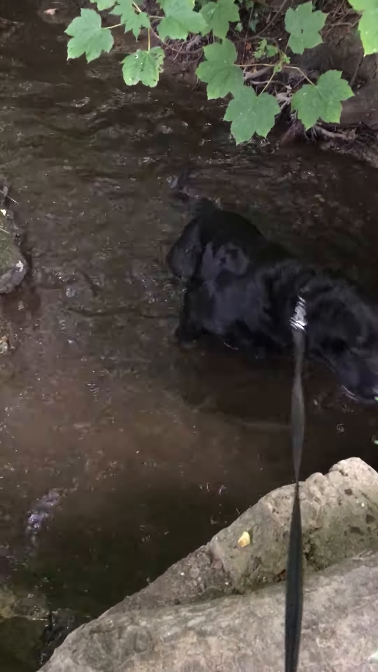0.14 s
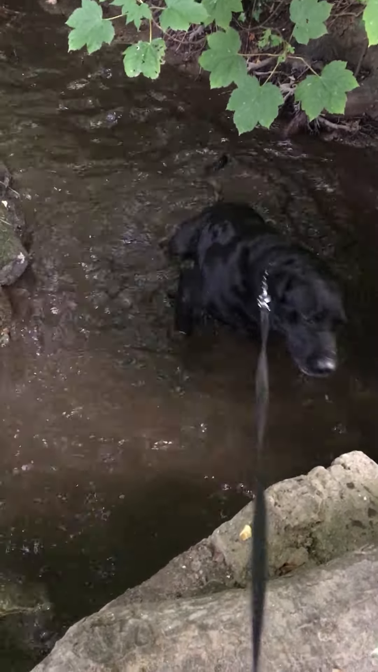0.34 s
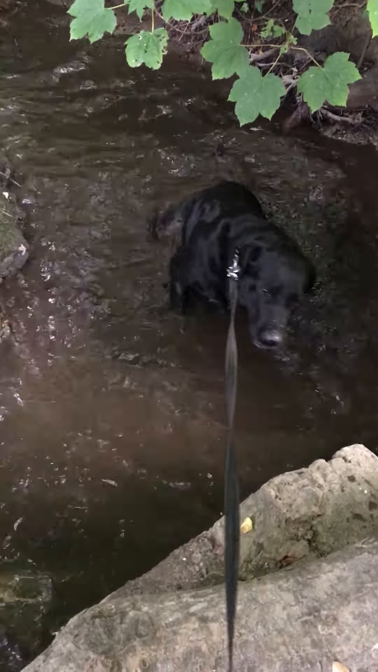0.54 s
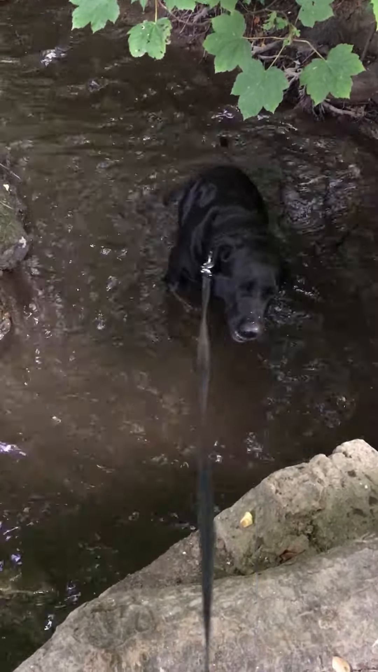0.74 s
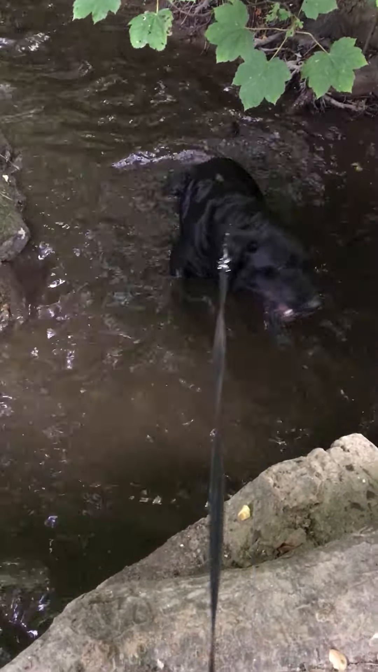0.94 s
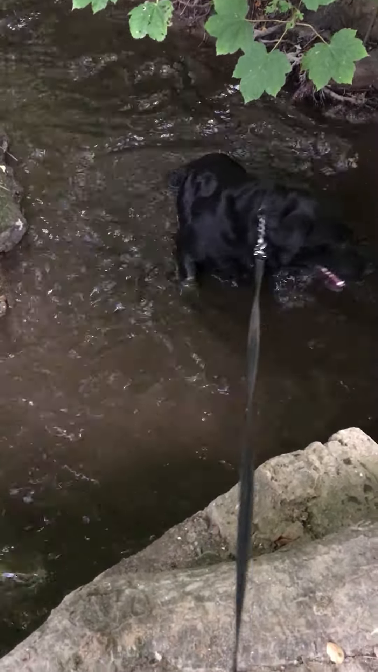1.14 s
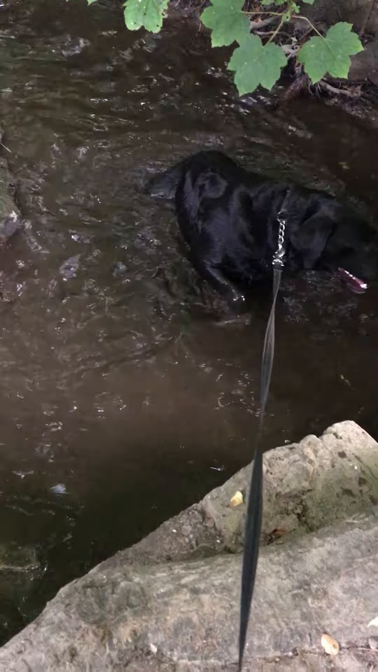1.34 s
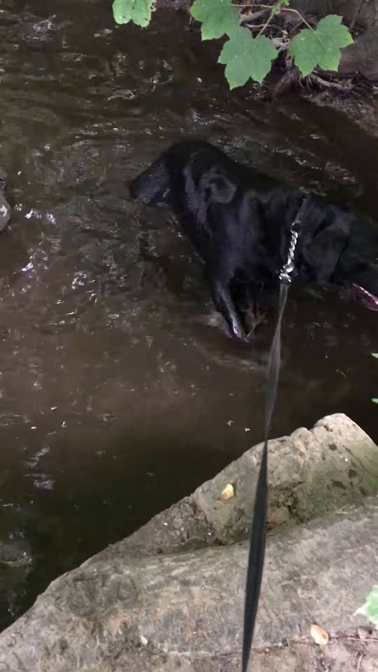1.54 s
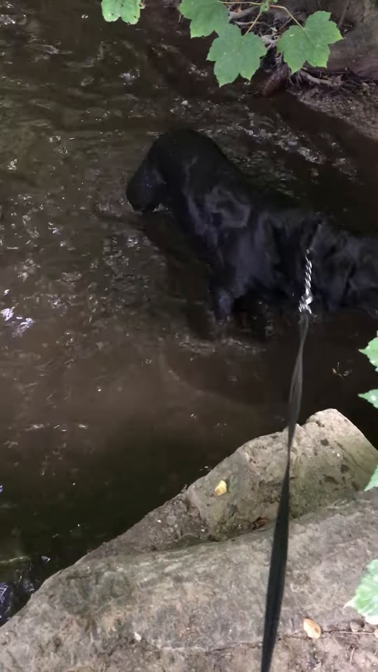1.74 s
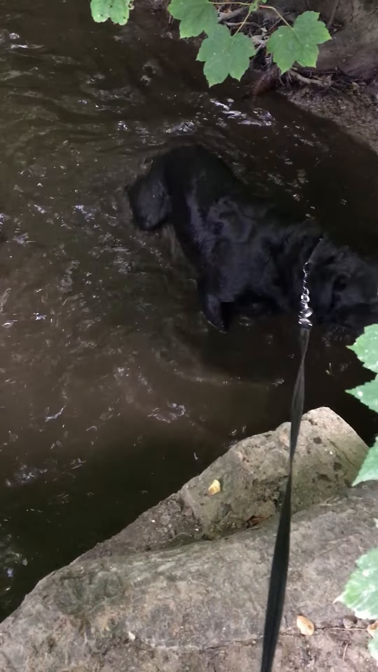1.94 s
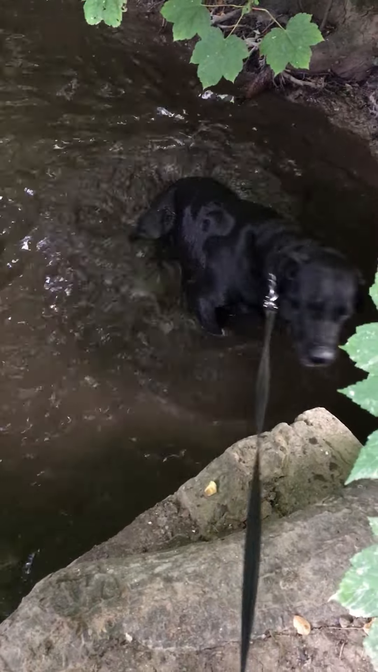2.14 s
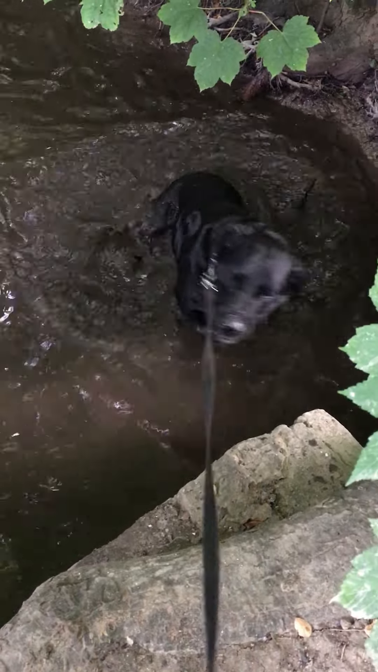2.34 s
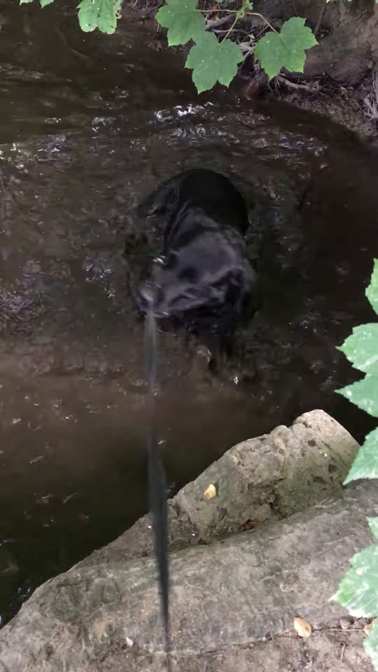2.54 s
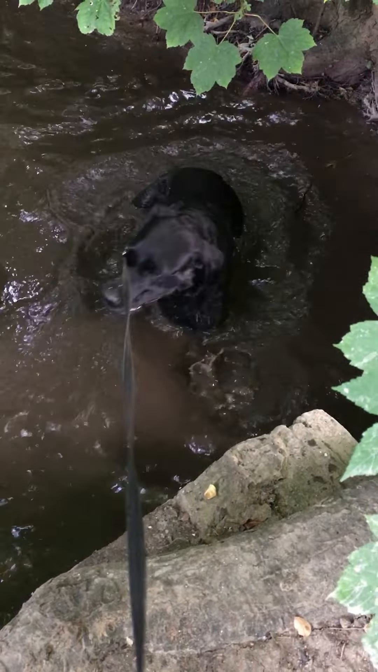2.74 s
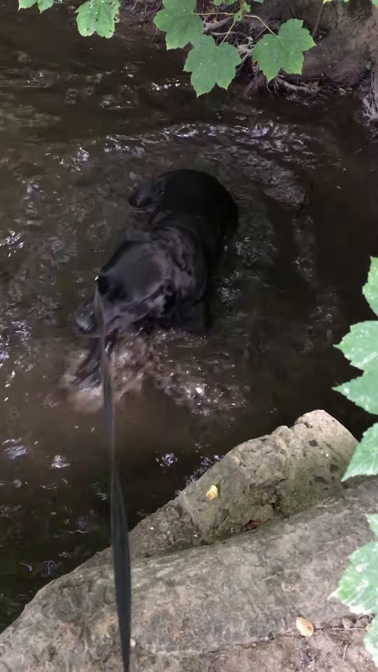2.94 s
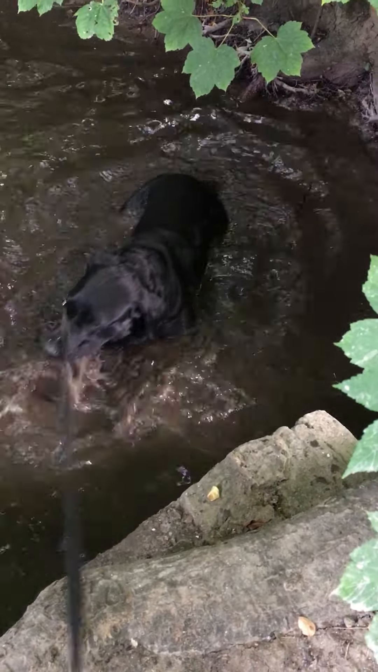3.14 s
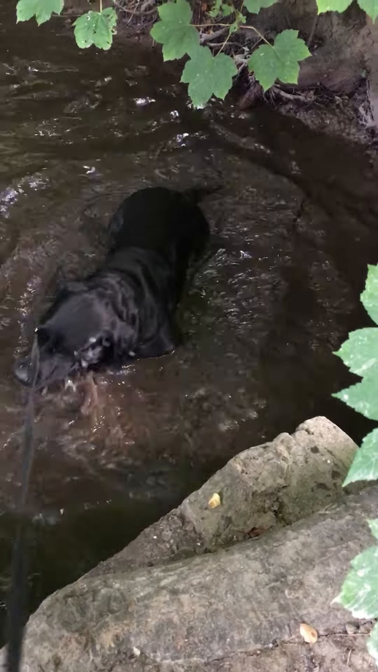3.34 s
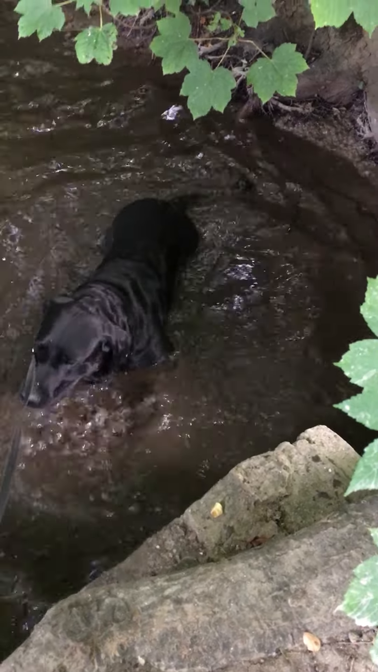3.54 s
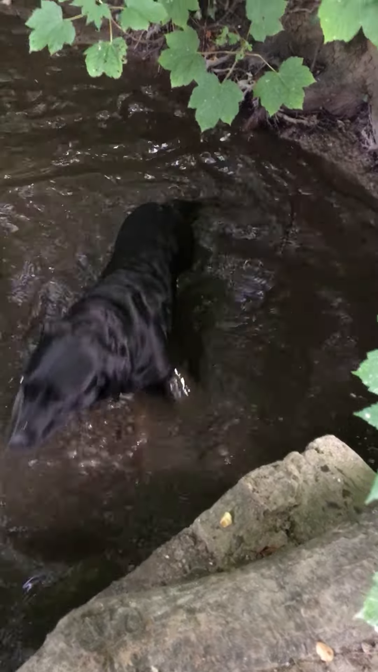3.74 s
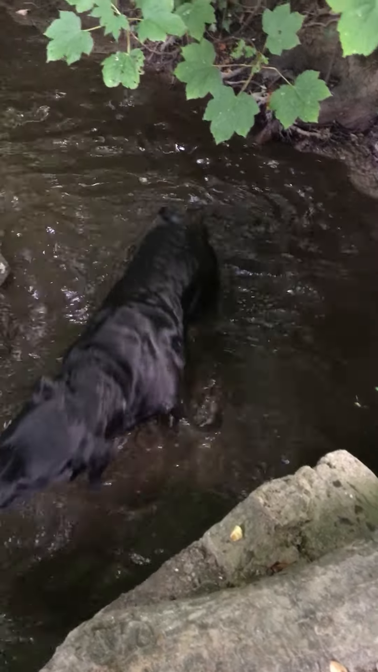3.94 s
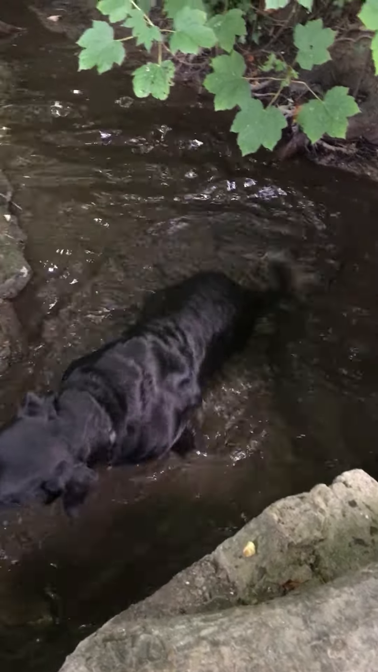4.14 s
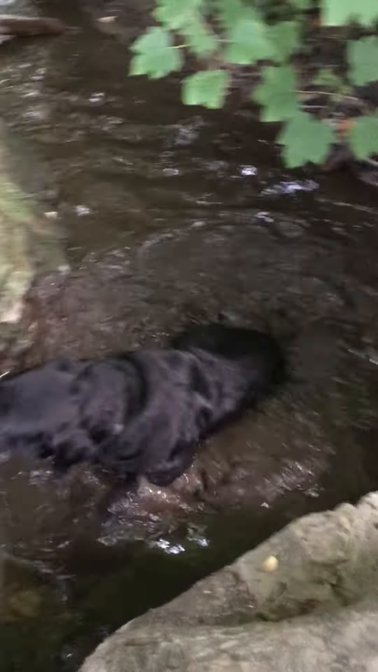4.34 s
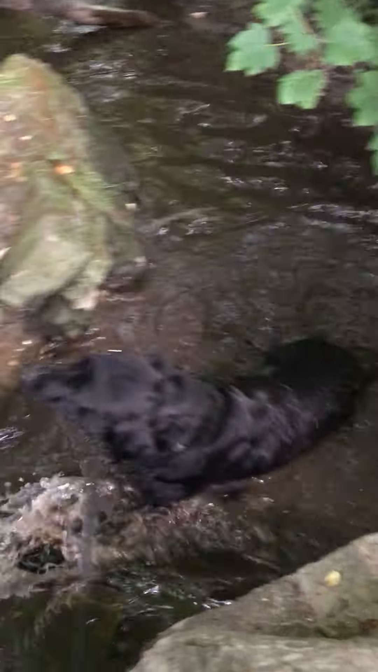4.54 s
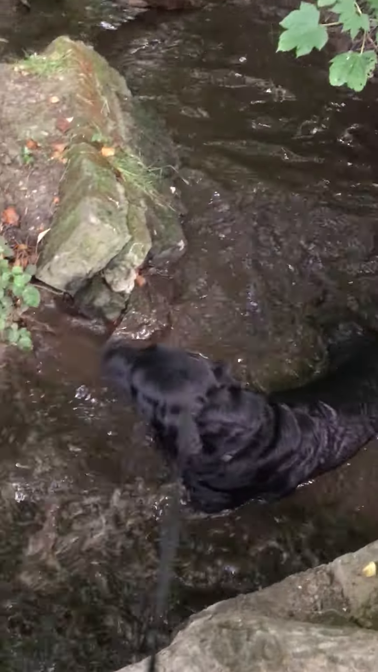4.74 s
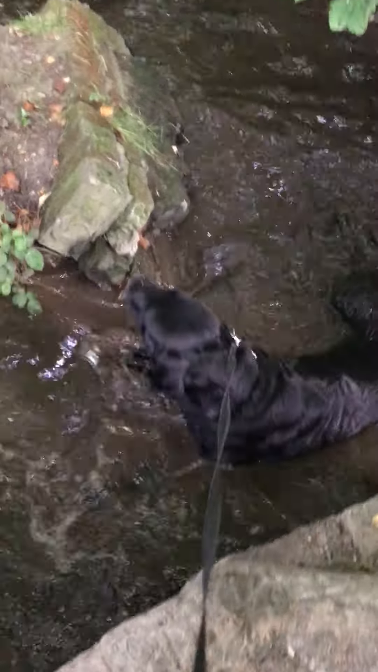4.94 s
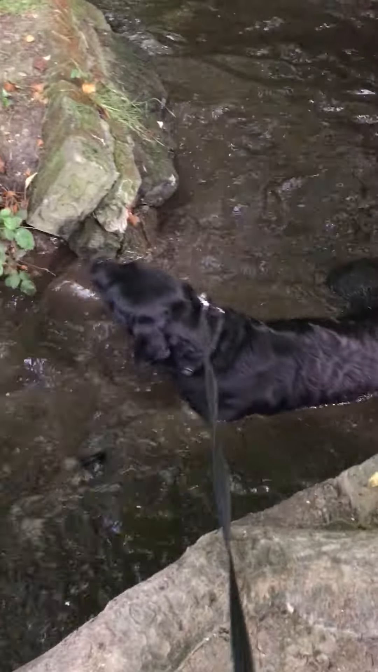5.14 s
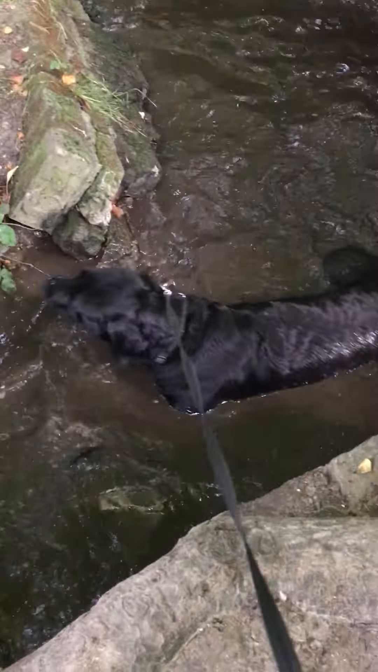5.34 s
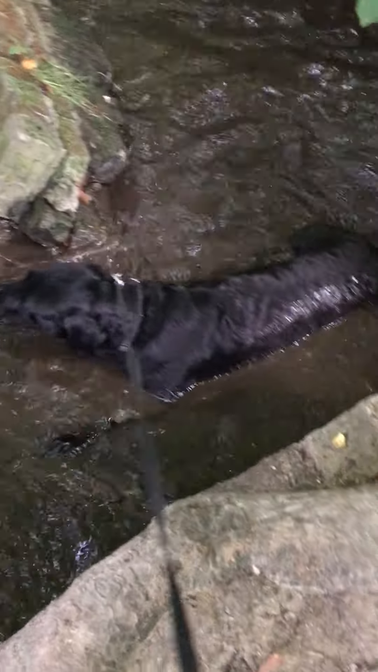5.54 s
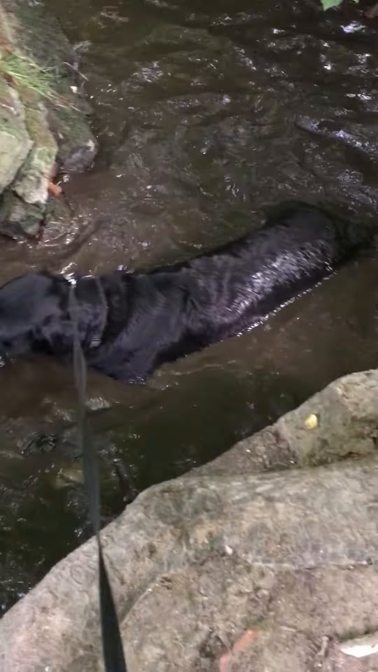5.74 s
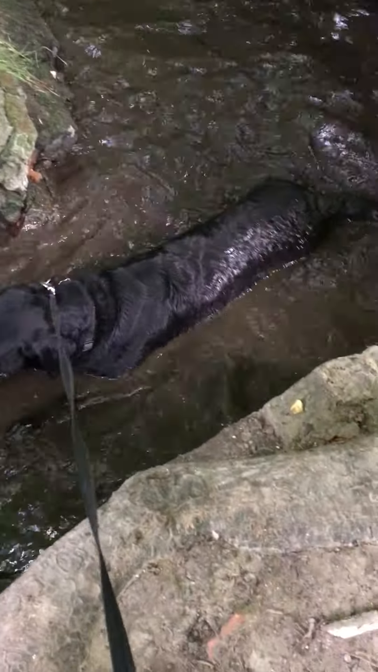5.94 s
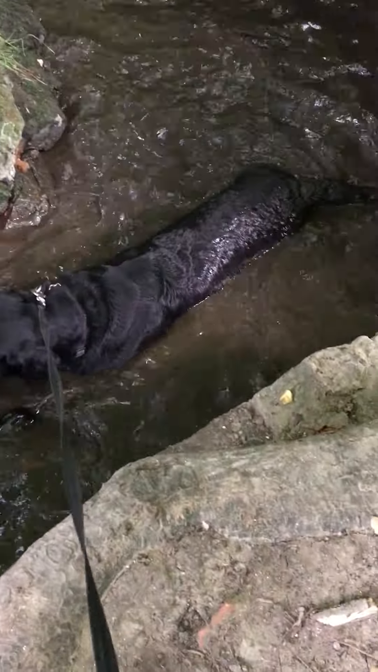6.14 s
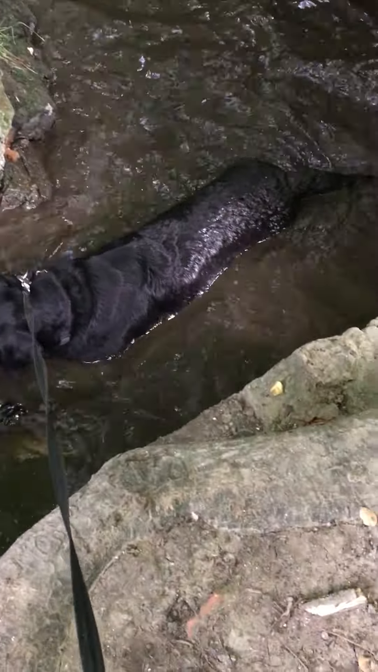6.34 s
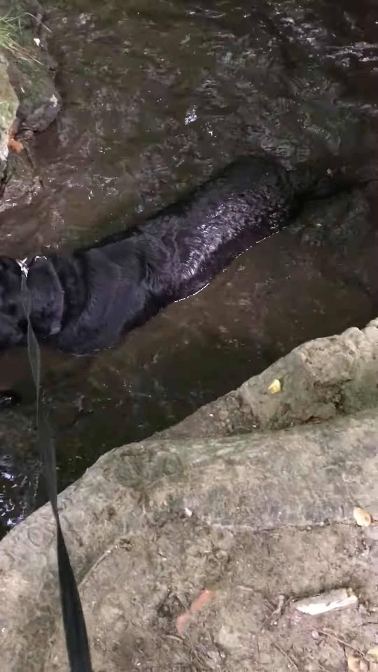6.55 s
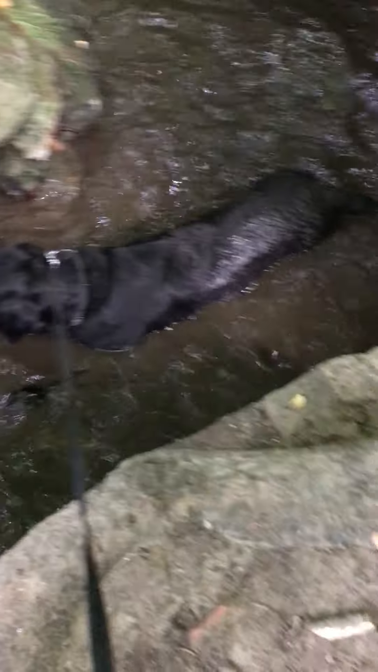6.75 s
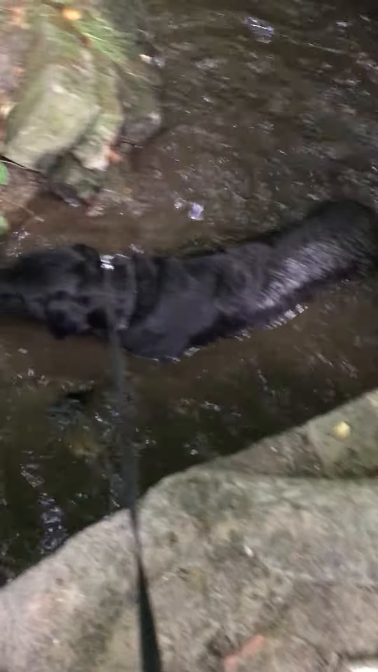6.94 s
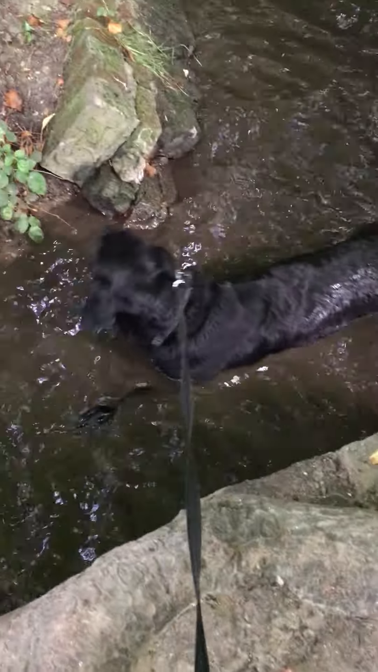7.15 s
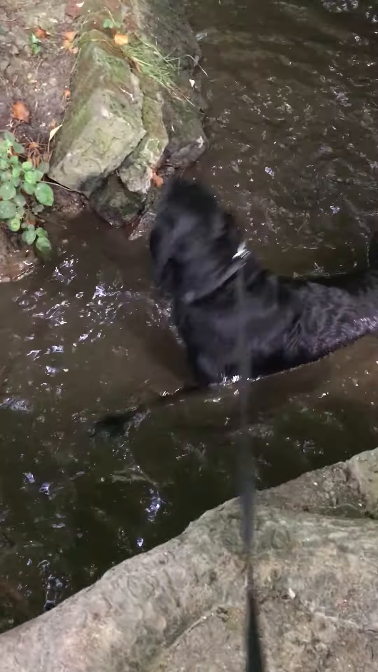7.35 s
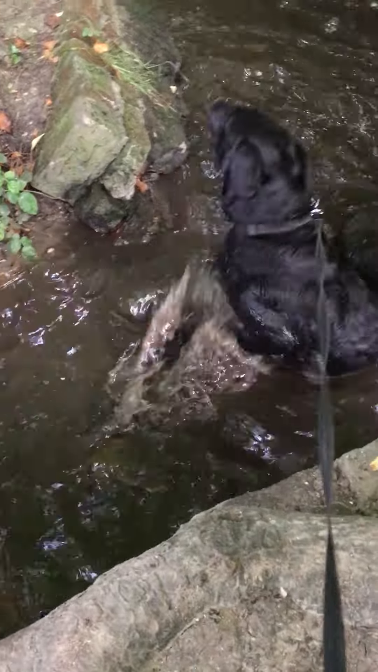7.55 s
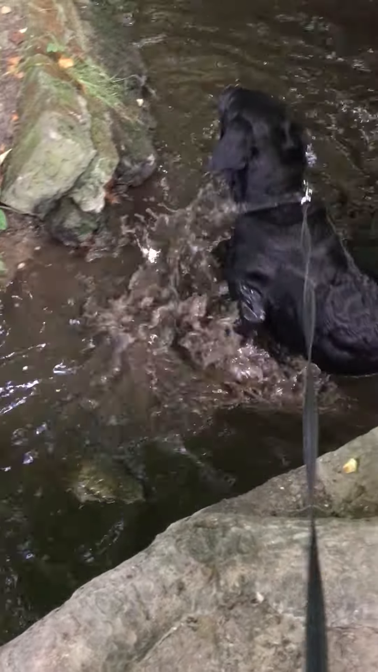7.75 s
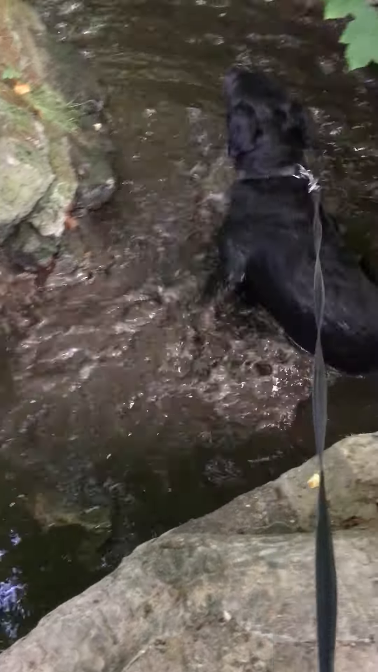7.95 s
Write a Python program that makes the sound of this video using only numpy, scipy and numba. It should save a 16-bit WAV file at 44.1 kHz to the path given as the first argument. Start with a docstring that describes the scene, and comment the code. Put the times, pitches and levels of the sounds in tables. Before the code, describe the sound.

A dog wades in a shallow woodland stream, with splashy slaps, bubbling sloshes and soft early panting, then a quiet birdsong lull before vigorous churning.

```python
"""First a leg sweeps and slaps the water: a dog wades in a shallow woodland stream, lunging off at the end.
It is a few steps below the microphone: slaps are crackling noise bursts, trapped air rings as damped sines,
and swarms of tiny bubbles and spray follow the stirring. Hollows gulp, legs thump and the coat drips.
Early on it pants softly, as puffs of noise shaped by the muzzle; later its lead slides and the reel turns.
A songbird trills far off among the trees, in buzzing sines, over noise for the stream and a low rumble."""
import sys
import numpy as np
from scipy import signal
from scipy.fft import rfft, irfft
from scipy.io import wavfile
from numba import njit

SR = 44100
rng = np.random.default_rng(int(sys.argv[2]) if len(sys.argv) > 2 else 0)


def inscribe(sig):
    """Save sig as 16-bit PCM at rate SR to the path in sys.argv[1].

    A 1-D sig is mono; a 2-D sig holds one channel per row.
    Samples are clipped to [-1, 1] before scaling.
    """
    pcm = np.round(np.clip(np.atleast_2d(sig).T, -1, 1) * 32767)
    wavfile.write(sys.argv[1], SR, pcm.astype(np.int16))


N = 357210
TIME = np.arange(N) / SR


def amp(db):
    """Decibels to gain."""
    return 10 ** (np.asarray(db) / 20)


def unit(x):
    """Scales to rms 1."""
    return x / np.sqrt(np.mean(x ** 2) + 1e-20)


def read(points, hz):
    """A spectrum's gain at hz, interpolated in dB on a log-frequency axis."""
    f, db = np.transpose(points)
    return amp(np.interp(np.log(hz + 1), np.log(f), db))


def colour(x, points):
    """Filters x by a spectrum."""
    hz = np.fft.rfftfreq(len(x), 1 / SR)
    return irfft(rfft(x) * read(points, hz), len(x))


def drift(size, hz):
    """Smooth random wandering of rms 1: noise with a Gaussian low-pass of scale hz."""
    lowpass = np.exp(-(np.fft.rfftfreq(size, 1 / SR) / hz) ** 2)
    return unit(irfft(rfft(rng.standard_normal(size)) * lowpass, size))


def split(x):
    """Divides a water sound near 2600 Hz into its body and its spray, each at rms 1."""
    hz = np.fft.rfftfreq(len(x), 1 / SR)
    body = irfft(rfft(x) / (1 + (hz / 2600) ** 8), len(x))
    return unit(body), unit(x - body)


def add(mix, s, sound):
    """Mixes a sound in at time s."""
    part = mix[max(round(s * SR), 0):][:len(sound)]
    part += sound[:len(part)]


def swells(rows, taper):
    """A level that swells, holds and fades once for each row."""
    out = np.zeros(N)
    for s, length, db in rows:
        add(out, s, amp(db) * signal.windows.tukey(int(length * SR), taper))
    return out


def resonate(x, hz, width):
    """A resonance at hz: shifts that pitch to zero, smooths with one pole, and shifts back."""
    turn = np.exp(2j * np.pi * np.cumsum(hz * np.ones(len(x))) / SR)
    r = np.exp(-np.pi * width / SR)
    return 2 * (turn * signal.lfilter([1 - r], [1, -r], x / turn)).real


def tail(x, t60):
    """Diffuse echoes: sparse random taps that lose 60 dB in t60 seconds."""
    t = np.arange(SR) / SR
    taps = rng.standard_normal(SR) * (rng.random(SR) < .1)
    echoes = taps * amp(-60 * t / t60) * np.minimum(t / 0.0011, 1)
    return signal.oaconvolve(x, echoes / np.linalg.norm(echoes))[:N]


def bubble(hz, cycles, rise):
    """A pocket of air rings and dies; its pitch climbs as it nears the surface."""
    turns = np.arange(int(7 * cycles / hz * SR) + 2) * hz / SR
    age = turns / cycles
    return (1 - np.exp(-2 * turns)) * np.exp(-age) * np.sin(2 * np.pi * turns * (1 + rise * age))


# paws and thrown water hitting the surface: (t/s, body onset level/dB, spray onset level/dB, decay/s,
# trapped air's starting f/Hz, its gain/dB)
SURFACE_SLAPS = [(.0273, -36.5, -41.5, 0.0054, 470, -20.5), (.069, -39, -38, 0.0069, 2860, -22),
                 (.6293, -51, -64, 0.01, 520, -30), (.7777, -48, -43.5, 0.0062, 1040, -25),
                 (.8195, -40.5, -33.8, 0.0057, 2200, -29), (.939, -72, -53, .002, 9500, -25),
                 (1.4377, -48, -56, .02, 1100, -28), (1.446, -46, -55, .006, 1250, -26),
                 (1.5495, -56, -30.5, 0.0053, 3020, -38), (1.7768, -47, -43.5, 0.004, 1210, -31),
                 (1.8841, -69, -47, 0.0046, 3270, -32), (1.921, -54, -45.5, 0.017, 2400, -38),
                 (1.9961, -35.5, -36, 0.0055, 766, -15.5), (2.024, -34, -39, 0.0044, 1300, -22),
                 (2.138, -56, -41, 0.0072, 4200, -16.5), (2.4193, -29.5, -37.5, 0.0055, 900, -16.5),
                 (2.4486, -30, -31, 0.0016, 2330, -32), (2.4992, -40, -46.5, 0.0088, 467, -23.5),
                 (2.6865, -52, -39.5, .008, 470, -28), (2.99, -37.5, -35, .012, 880, -31),
                 (3.15, -35, -33, 0.0095, 362, -20.5), (3.1612, -41, -31, 0.01, 2040, -17),
                 (3.096, -54, -42.5, 0.0034, 5200, -39), (3.4538, -72, -37, 0.0015, 9150, -20),
                 (3.599, -45, -52, .018, 480, -31), (3.6495, -46, -28, 0.0012, 2040, -15.5),
                 (3.842, -46, -35.5, 0.0045, 2800, -20), (4.3667, -46, -31.5, 0.0078, 2830, -19),
                 (4.443, -31.5, -36, 0.0072, 1200, -32), (4.531, -28, -25, 0.0053, 740, -15),
                 (4.6184, -38, -29.4, 0.0021, 2180, -11.5), (5.088, -35, -43, .017, 1200, -15),
                 (5.419, -39.5, -49.5, 0.011, 1090, -47), (5.4815, -37, -30, 0.0066, 2950, -28),
                 (5.649, -44, -41.5, .0097, 640, -24), (6.186, -46.5, -61, 0.0065, 1220, -38),
                 (6.233, -54, -49, 0.0067, 1990, -35), (6.6935, -59, -55, 0.0093, 1120, -37),
                 (7.505, -63, -45, .0046, 2470, -8), (7.555, -55, -33, 0.012, 3000, -32),
                 (7.782, -51, -42, 0.0031, 800, -20), (8.01, -57, -30.5, 0.0017, 900, -26)]
# colour of a slap, close to the microphone: (f/Hz, level/dB)
SLAP_SPECTRUM = [(60, -10), (200, 0), (500, -13), (1300, 4), (2300, -6.5), (3000, -2), (6000, -1.5),
                 (9000, -10), (10500, -12.5), (12000, -13.5), (16000, -16)]
POCKET_CYCLES = 1.24  # air caught under a slap bursts almost at once


def slaps(attack=0.00014, crackle_db=1.0, variety_db=1.5, rise=0.0032):
    """Each slap is a sudden burst of crackle in its own colour, with the knock of the air trapped under it."""
    out, t = np.zeros(N), np.arange(SR // 8) / SR
    for s, low_db, high_db, decay, pocket_hz, pocket_db in SURFACE_SLAPS:
        tint = [(hz, db + variety_db * rng.standard_normal()) for hz, db in SLAP_SPECTRUM]
        crackle = rng.standard_normal(len(t)) * amp(crackle_db * drift(len(t), 600))
        body, mist = split(colour(crackle, tint))
        fade = np.exp(-t / decay) * (1 - np.exp(-t / attack))
        burst = amp(low_db) * unit(body * fade) + amp(high_db) * unit(mist * fade)
        # undo the averaging over the fade, so the table levels are those at the onset
        add(out, s - attack, burst * np.sqrt(np.mean(np.exp(-2 * t / decay))))
        add(out, s, amp(pocket_db) * bubble(pocket_hz, POCKET_CYCLES, rise))
    return out


# legs sweeping through the water: (start t/s, length/s, slosh level/dB before the trim in churn, spray level/dB)
LEG_STROKES = [(0.003, 0.088, -50.5, -55.5), (0.307, 0.029, -58.5, -59.5), (0.676, 0.11, -56, -75),
               (0.826, 0.023, -50.5, -56), (0.936, 0.025, -57, -55.5), (1.286, 0.11, -69, -62.5),
               (1.431, 0.062, -48, -60.5), (1.504, 0.032, -47.5, -45), (1.77, 0.033, -65, -61.5),
               (1.917, 0.09, -45.5, -51), (2.009, 0.032, -37, -44.5), (2.066, 0.033, -41.5, -51),
               (2.154, 0.091, -45.5, -50), (2.41, 0.038, -45.5, -47.5), (2.535, 0.015, -44.5, -49),
               (2.616, 0.065, -43.5, -57.5), (2.787, 0.097, -46, -60), (2.891, .11, -45, -47),
               (3.11, 0.13, -53.5, -51.5), (3.495, 0.18, -63.5, -60), (3.892, 0.19, -51.5, -56.5),
               (4.061, 0.096, -44, -52.5), (4.107, 0.092, -43, -44), (4.335, 0.14, -38.5, -47),
               (4.5, 0.069, -38.5, -40), (4.57, 0.23, -45.5, -44.5), (4.869, 0.18, -43.5, -50),
               (5.055, 0.027, -42, -45), (5.204, 0.033, -52.5, -57), (5.466, 0.027, -54, -49),
               (6.022, 0.019, -52.5, -58.5), (7.462, 0.043, -46.5, -49.5), (7.491, 0.062, -35.5, -39.5),
               (7.557, 0.17, -35.5, -40.5), (7.734, 0.21, -37.5, -39.5), (7.97, 0.15, -34.5, -41)]
STROKE_ATTACK_S, SLOSH_RELEASE_S, SPRAY_RELEASE_S = 0.022, 0.035, 0.032
WAKE_DB, WAKE_S = -14, 0.19  # the disturbed water settles slowly after each stroke
# lapping around the dog's body: (t/s, level/dB before the trim in churn)
BODY_LAPPING = [(0, -64), (.75, -59), (.92, -82), (1.25, -69.5), (1.6, -62), (1.88, -68), (2.4, -55),
                (3.35, -58), (3.75, -60.5), (4.4, -44), (5.2, -55), (5.95, -64), (6.2, -72), (7.15, -73),
                (7.45, -58)]
LAP_SPRAY_DB = -4  # spray of the lapping, relative to its untrimmed level


def stirring():
    """Slosh and spray levels: each stroke builds, holds, falls back and leaves a wake, over the lapping."""
    lap = amp(np.interp(TIME, *np.transpose(BODY_LAPPING)))
    # powers are summed
    slosh, spray, t = lap ** 2, (lap * amp(LAP_SPRAY_DB)) ** 2, TIME[:SR]
    for s, length, slosh_db, spray_db in LEG_STROKES:
        push, after = np.minimum(t / STROKE_ATTACK_S, 1), np.maximum(t - length, 0)
        wake = amp(WAKE_DB) * np.exp(-after / WAKE_S)
        slosh_fall = np.maximum(np.exp(-after / SLOSH_RELEASE_S), wake)
        spray_fall = np.maximum(np.exp(-after / SPRAY_RELEASE_S), wake)
        add(slosh, s, (amp(slosh_db) * push * slosh_fall) ** 2)
        add(spray, s, (amp(spray_db) * push * spray_fall) ** 2)
    return np.sqrt(slosh), np.sqrt(spray)


@njit
def ring_all(start, pitch, size, cycles, rise, length):
    """Sums many small bubbles, each ringing and rising; pitch is in turns per sample."""
    out = np.zeros(length)
    for k in range(len(start)):
        for i in range(min(int(6 * cycles[k] / pitch[k]), length - start[k])):
            turns = i * pitch[k]
            age = turns / cycles[k]
            ring = np.exp(-age) * np.sin(2 * np.pi * turns * (1 + rise[k] * age))
            out[start[k] + i] += size[k] * (1 - np.exp(-2 * turns)) * ring
    return out


# filter on the bubble swarm, its fizz and its drops together: (f/Hz, level/dB)
SWARM_SPECTRUM = [(200, 0), (300, -6.5), (450, 2), (800, 6.5), (1400, 5), (2250, 1), (2800, -5.5),
                  (4200, -8), (7000, -11), (9500, -12.5), (10500, -19), (12000, -16), (16000, -24)]


def churn(share=.2, calm_share=.45, busy_db=-42, size_db=4.0, cycles=7.2, rise=0.012, fizz_db=5,
          patter_db=4.5, drops_db=-9, clots_per_s=60, clot_s=0.012, clot_gain=0.93, body_db=-1,
          mist_hz=7000, count=100000):
    """Swarms of bubbles of every pitch and ticking droplets, thicker when the water is stirred harder."""
    slosh, spray = stirring()
    busy = calm_share + slosh / amp(busy_db)

    # keep more of the candidate bubbles where the water is busier
    draws = rng.random((count, 6))
    chance = share * busy[(draws[:, 0] * N).astype(int)]
    when, pitch, bulk, damping, climb, _ = draws[draws[:, 5] < chance].T
    start = (when * N).astype(int)
    hz = 280 + 13000 * pitch ** 1.1
    ring = cycles * (hz / 1000) ** 0.39 * 2 ** (2 * damping - 1)
    variety_db = size_db / (1 + hz / 14000)  # the finest bubbles are the most alike
    bulk_db = variety_db * (np.minimum(-np.log(1 - bulk), 2.8) - 2.5)
    size = amp(bulk_db) * np.sqrt(hz / ring / busy[start])
    size = size / (1 + (hz / mist_hz) ** 2)  # the highest treble is mostly spray
    swarm = ring_all(start, hz / SR, size, ring, 2 * rise * climb, N)

    hiss = signal.lfilter([1, -.8], [1], rng.standard_normal(N))
    fizz = unit(hiss * amp(patter_db * drift(N, 340)))  # fine spray patters on the surface
    drops = unit(rng.standard_normal(N) * (rng.random(N) < 70 * busy / SR))  # large drops tick
    water = unit(swarm) + amp(fizz_db) * fizz + amp(drops_db) * drops
    body, mist = split(colour(water, SWARM_SPECTRUM))

    # water falls back in clots, each a sudden surge that fades
    falls = rng.random(N) * (rng.random(N) < clots_per_s / SR)
    surges = signal.lfilter([1], [1, -np.exp(-1 / (clot_s * SR))], falls)
    clots = unit(1 + clot_gain * surges)
    return clots * (body * slosh * amp(body_db) + mist * spray)


# a leg plunging deep, with a hollow thump: (t/s, starting f/Hz, gain/dB)
LEG_THUMPS = [(1.9967, 140, -21.5), (2.1047, 198, -23.5), (2.4508, 110, -19.5), (2.6876, 132, -27),
              (2.9803, 247, -27), (3.17, 136, -15), (3.1769, 58.4, -26), (3.227, 154, -25.5),
              (3.5983, 218, -27.5), (4.9844, 260, -10.5), (4.9896, 70.4, -21), (4.9943, 254, -12.5),
              (5.657, 62, -22.5)]
THUMP_CYCLES = 0.63


def thumps(rise=0.0073):
    """The big cavity around a plunging leg gives one heavily damped low ring."""
    out = np.zeros(N)
    for s, hz, db in LEG_THUMPS:
        add(out, s, amp(db) * bubble(hz, THUMP_CYCLES, rise))
    return out


# single loud bubbles: (t/s, starting f/Hz, gain/dB)
LOUD_BUBBLES = [(.0275, 734, -30), (0.0703, 893, -32.5), (0.5298, 770, -35), (0.6312, 1910, -38),
                (0.7008, 964, -37), (1.4466, 740, -34), (1.4665, 1284, -32.5), (1.6838, 1460, -32.5),
                (1.7254, 1280, -33), (1.933, 460, -33), (1.9467, 2400, -34), (2.419, 2270, -21),
                (2.4486, 1320, -22), (2.4584, 284, -35), (2.6005, 390, -32), (2.6297, 2180, -31),
                (2.9083, 1360, -28.5), (3.137, 1570, -35), (3.1499, 636, -27.5), (3.165, 3270, -26),
                (3.41, 1610, -39), (3.5728, 1937, -36), (3.711, 3800, -36), (3.83, 832, -30),
                (3.8568, 1690, -31), (3.942, 1700, -35), (4.077, 1330, -30.5), (4.15, 1446, -28),
                (4.223, 1490, -28), (4.3573, 600, -28.5), (4.3593, 1960, -28), (4.4307, 3500, -27),
                (4.529, 2350, -20.5), (4.8916, 696, -31), (5.077, 1250, -28), (5.0774, 740, -32),
                (5.107, 2430, -26.5), (5.3781, 870, -41.5), (5.49, 1320, -27.5), (5.5187, 1290, -31),
                (5.5197, 640, -35.5), (5.692, 900, -40.5), (5.771, 1290, -41), (5.862, 1640, -42),
                (5.9958, 587, -31), (5.996, 1236, -36.5), (6.034, 1960, -40.5), (6.0346, 730, -35.5),
                (6.9287, 1010, -53.5), (7.0844, 1020, -51.5), (7.581, 390, -37), (7.607, 888, -23),
                (7.6502, 474, -25), (7.688, 2090, -24), (7.7167, 4000, -25.5), (7.7275, 887, -21.5),
                (7.8122, 2090, -26)]
RING_CYCLES, RING_GROWTH = 6.15, 0.21  # cycles at 1 kHz; smaller bubbles ring for more, as this power of pitch


def plops(rise=0.0081):
    """The loud single bubbles: each is a ringing pocket of air that rises in pitch."""
    out = np.zeros(N)
    for s, hz, db in LOUD_BUBBLES:
        cycles = RING_CYCLES * (hz / 1000) ** RING_GROWTH
        add(out, s, amp(db) * bubble(hz, cycles, rise))
    return out


# hollows closing behind a leg: (t/s, length/s, first f/Hz, last f/Hz, level/dB); the pitch also wobbles
CLOSING_HOLLOWS = [(0.038, 0.027, 536, 1110, -52), (.642, 0.044, 493, 855, -53.5),
                   (1.93, .049, 465, 640, -42.5), (2.455, .04, 326, 510, -47.5),
                   (2.537, .082, 210.7, 480, -50.5), (2.957, 0.046, 255, 403, -51),
                   (3.338, 0.066, 429, 647, -52.5), (3.511, 0.057, 482, 1000, -57),
                   (3.965, .08, 594, 655, -56), (4.359, 0.069, 483, 422, -45.5),
                   (4.629, 0.082, 392, 565, -60), (5.033, 0.053, 353, 696, -48),
                   (5.079, 0.041, 1049, 1530, -43), (5.229, .05, 568, 810, -51),
                   (7.554, 0.059, 340, 490, -48.5), (7.64, 0.06, 456, 530, -39),
                   (7.938, .069, 353, 563, -43)]


def gulps(wobble=0.04, flutter_db=4.5):
    """A trapped hollow rings as water fills it; its pitch slides ever faster, nearly always upwards."""
    out = np.zeros(N)
    for s, length, first_hz, last_hz, db in CLOSING_HOLLOWS:
        age = np.linspace(0, 1, int(length * SR))
        bend = drift(SR // 4, 135)[:len(age)]
        flutter = drift(SR // 4, 97)[:len(age)]
        hz = first_hz * (last_hz / first_hz) ** (age ** 2) * (1 + wobble * bend)
        swell = signal.windows.tukey(len(age), .6) * amp(flutter_db * flutter)
        add(out, s, amp(db) * unit(swell * np.sin(2 * np.pi * np.cumsum(hz) / SR)))
    return out


def drips(per_s=28, low_hz=1500, high_hz=8500, level_db=15, ceiling_db=-52, spread_db=3, rise=0.017, count=400):
    """Drops off the dog's coat plink, each leaving a tiny bubble; louder with the spray, up to a ceiling."""
    out, wet = np.zeros(N), np.minimum(stirring()[1], amp(ceiling_db))
    for when, pitch, size, chance in rng.random((count, 4)):
        hz = low_hz * (high_hz / low_hz) ** pitch
        if chance < per_s * N / SR / count:
            gain = wet[int(when * N)] * amp(level_db + spread_db * (2 * size - 1))
            cycles = RING_CYCLES * (hz / 1000) ** RING_GROWTH
            add(out, when * N / SR, gain * bubble(hz, cycles, rise))
    return out


# bouts of panting: (start t/s, number of puffs, level/dB before the trim in panting)
PANTING_BOUTS = [(.1, 4, -58), (.947, 4, -55.5), (1.775, 1, -53)]
PUFF_EVERY_S, PUFF_S = 0.116, 0.081
# resonances of the open muzzle: (f/Hz, half the width of each of two passes/Hz, level/dB)
MUZZLE_RESONANCES = [(566, 103, -6.5), (1256, 144, -1), (1580, 360, -12), (2100, 110, -10)]


def panting(level_db=-2):
    """Evenly paced puffs of turbulent air, coloured by the resonances of the dog's open muzzle."""
    rows = [(s + k * PUFF_EVERY_S, PUFF_S, db + level_db)
            for s, count, db in PANTING_BOUTS for k in range(count)]
    air = rng.standard_normal(N)
    breath = np.zeros(N)
    for hz, half_width, db in MUZZLE_RESONANCES:
        once = resonate(air, hz, 2 * half_width)
        breath += amp(db) * resonate(once, hz, 2 * half_width)
    return swells(rows, taper=0.77) * unit(breath)


# the taut lead sliding through its handle: (start t/s, length/s, level/dB)
LEAD_SLIDES = [(7.2, 0.17, -51.5), (7.33, 0.19, -56.5)]
# its reel turning: (start t/s, length/s, level/dB)
REEL_SPINS = [(5.13, 0.59, -54.5), (5.7, 0.44, -58.5), (7.21, 0.13, -59), (7.37, 0.05, -61)]
# colour of the rubbing tape: (f/Hz, level/dB)
TAPE_SPECTRUM = [(200, -8), (350, 6), (650, -8), (1300, -0.5), (2400, -6), (3000, -6), (4000, -7),
                 (7000, -7.5), (9500, -9.5), (10500, -14), (16000, -13)]
# resonances of the plastic casing: (f/Hz, width/Hz, level/dB relative to the rub)
HANDLE_RESONANCES = [(516, 25, 8), (2020, 57, 12.5), (4650, 400, 6), (8600, 390, -8)]
# colour of the reel: (f/Hz, level/dB)
REEL_SPECTRUM = [(80, -13), (140, 2.5), (210, 2), (310, -5.5), (380, -11), (600, -33.5)]


def lead():
    """The tape of the retractable lead rubs through its resonant plastic handle, and the reel turns."""
    rub = colour(rng.standard_normal(N), TAPE_SPECTRUM)
    casing = sum(amp(db) * resonate(rub, hz, width) for hz, width, db in HANDLE_RESONANCES)
    slide = unit(rub + casing)
    reel = unit(colour(rng.standard_normal(N), REEL_SPECTRUM))
    return slide * swells(LEAD_SLIDES, taper=.75) + reel * swells(REEL_SPINS, taper=0.56)


# the bird's closing notes, each buzzing as it falls and levels out:
# (t/s, length/s, first f/Hz, last f/Hz, level/dB before its path through the wood)
BIRD_FLOURISH = [(6.299, 0.022, 4440, 4360, -54.5), (6.322, 0.093, 4250, 2860, -53),
                 (6.531, 0.0295, 4630, 4150, -55.5), (6.541, .13, 3600, 3365, -56)]


def bird(start=5.52, gap=.078, note_s=0.051, count=9, top_hz=4500, bottom_hz=3150, trill_db=-57, buzz=0.08,
         buzz_hz=140, settle=2.2, fade_db=-5, t60=0.49, direct_db=-8):
    """Far off, a run of falling notes and a buzzing flourish, smeared by echoes among the trees."""
    song = np.zeros(N)
    sweep = np.geomspace(top_hz, bottom_hz, int(note_s * SR))
    for k in range(count):
        hz = sweep * (1 + buzz * drift(len(sweep), 740) / 2)
        note = signal.windows.tukey(len(hz), .5) * np.sin(2 * np.pi * np.cumsum(hz) / SR)
        add(song, start + k * gap, amp(trill_db) * unit(note))
    for s, length, first_hz, last_hz, db in BIRD_FLOURISH:
        age = np.linspace(0, 1, int(length * SR))
        fall = last_hz + (first_hz - last_hz) * (1 - age) ** settle
        hz = fall * (1 + buzz * np.sin(2 * np.pi * buzz_hz * length * age))
        swell = signal.windows.tukey(len(age), .25) * amp(fade_db * age)
        add(song, s, amp(db) * unit(swell * np.sin(2 * np.pi * np.cumsum(hz) / SR)))
    return amp(direct_db) * song + tail(song, t60)


# colour of the stream's wash: (f/Hz, level/dB)
STREAM_SPECTRUM = [(180, -41), (300, 4), (600, -34), (1100, -6), (2100, -3), (3000, -7), (4600, -8.5),
                   (8000, -15.5), (11000, -27), (16000, -19)]
# colour of the low outdoor rumble: (f/Hz, level/dB)
RUMBLE_SPECTRUM = [(20, -20), (40, -1), (60, 2.5), (110, -3.5), (200, -5.5), (300, -13), (500, -26),
                   (1200, -34)]
STREAM_DB, RUMBLE_DB = -72.5, -58.5  # rms levels


def background(waver_db=2.5):
    """The smooth noise wash of the stream over a low outdoor rumble that wavers in level."""
    wash = unit(colour(rng.standard_normal(N), STREAM_SPECTRUM))
    low = colour(rng.standard_normal(N), RUMBLE_SPECTRUM)
    rumble = unit(low * amp(waver_db * drift(N, 24)))
    return amp(STREAM_DB) * wash + amp(RUMBLE_DB) * rumble


# echoes off the rocks: (delay t/s, linear gain)
ROCK_ECHOES = [(.0036, 0.053), (0.0113, 0.15), (0.016, 0.064)]


def scene(bank_db=-16, bank_t60=0.32):
    """Water and dog echo between the rocks and the bank; the lead, bird and background join without these."""
    near = plops() + thumps() + slaps() + churn() + drips() + gulps() + panting()
    out = near + amp(bank_db) * tail(near, bank_t60)
    for delay, gain in ROCK_ECHOES:
        add(out, delay, gain * near)
    return (out + bird() + lead() + background())[None]


EDGE_HZ = 16050  # the recorder's upper band limit


def record(dry, low_hz=42):
    """The small microphone loses the deepest bass; then the recorder's band limit."""
    bass_cut = signal.butter(3, low_hz, "high", fs=SR, output="sos")
    thin = signal.sosfilt(bass_cut, dry)
    band_limit = signal.firwin(511, EDGE_HZ, window=("kaiser", 9), fs=SR)
    return signal.oaconvolve(thin, band_limit[None], "same")


dry = scene()
out = record(dry)
inscribe(out)
```